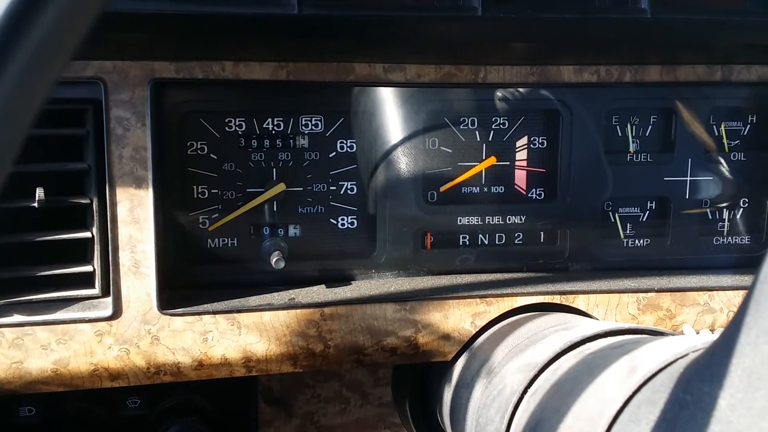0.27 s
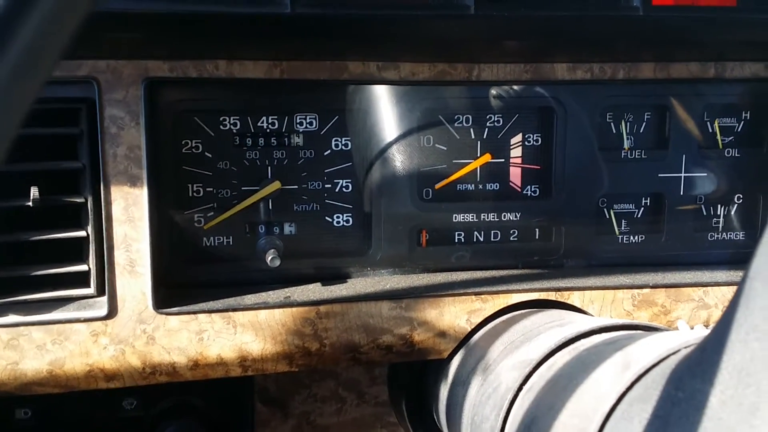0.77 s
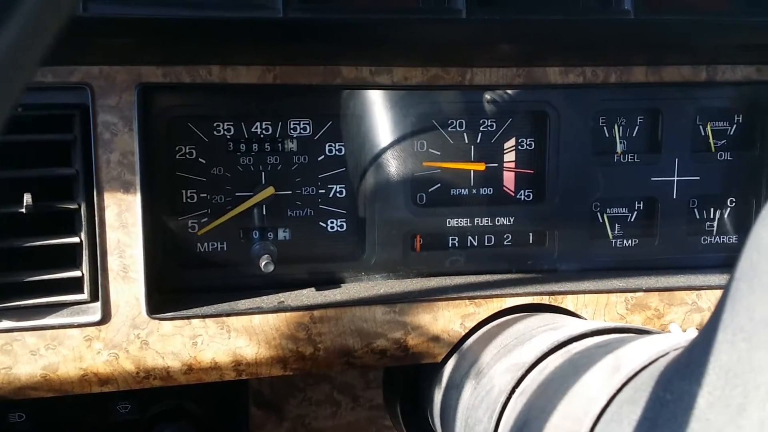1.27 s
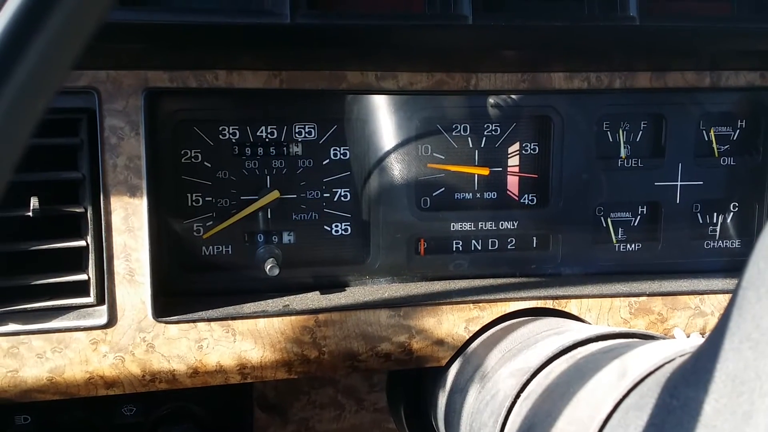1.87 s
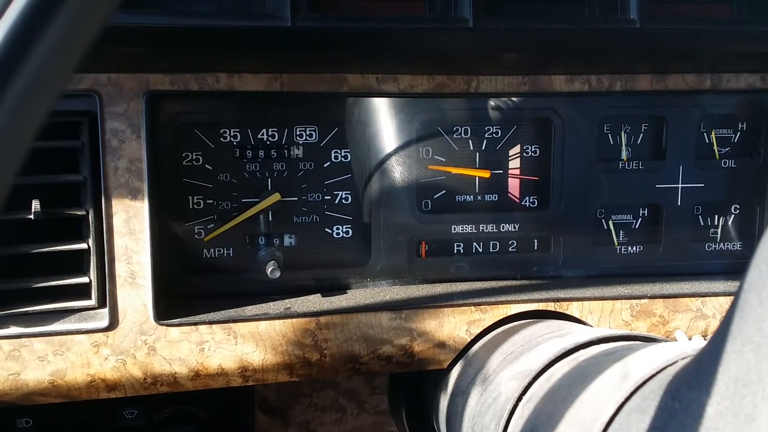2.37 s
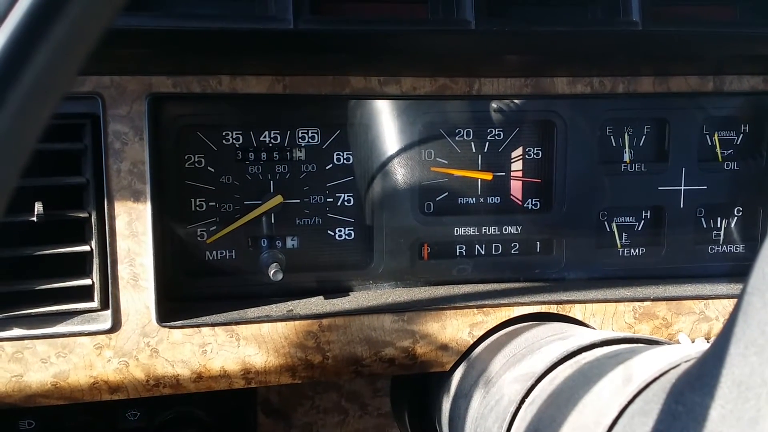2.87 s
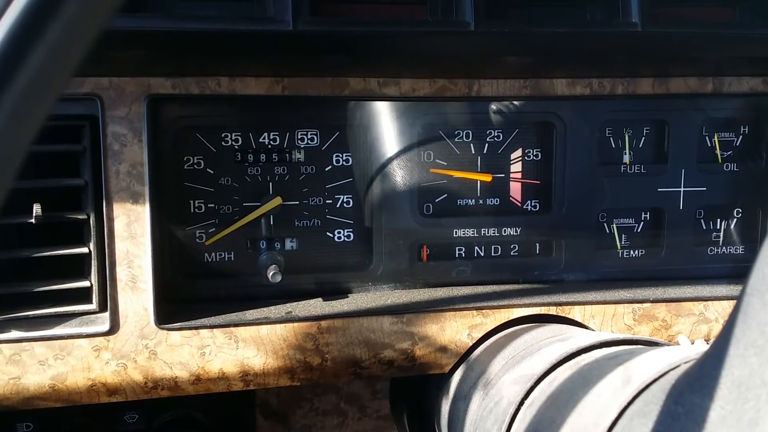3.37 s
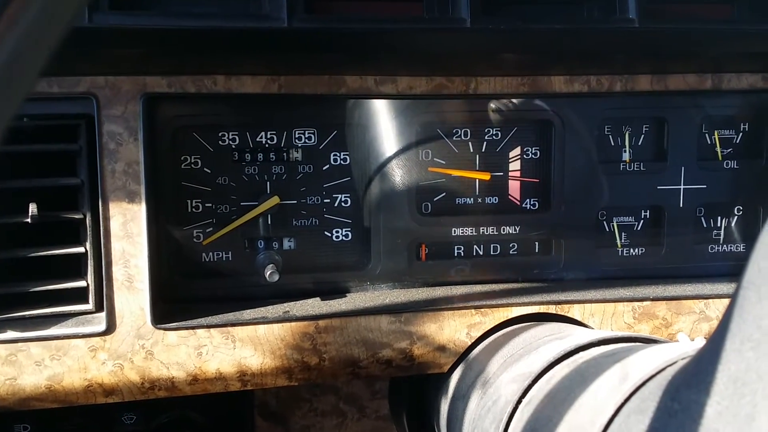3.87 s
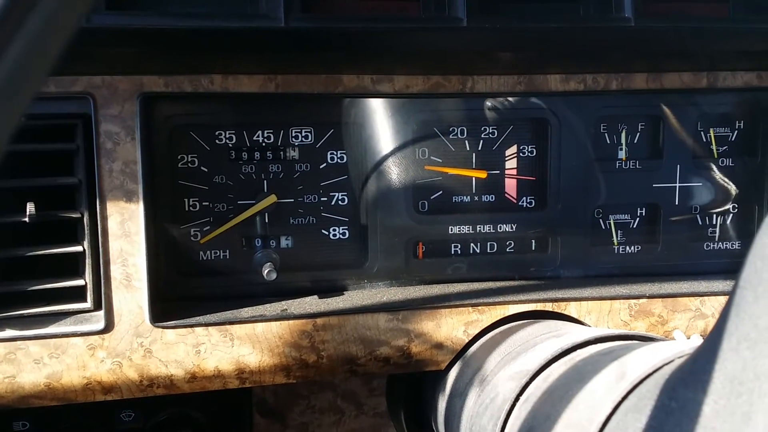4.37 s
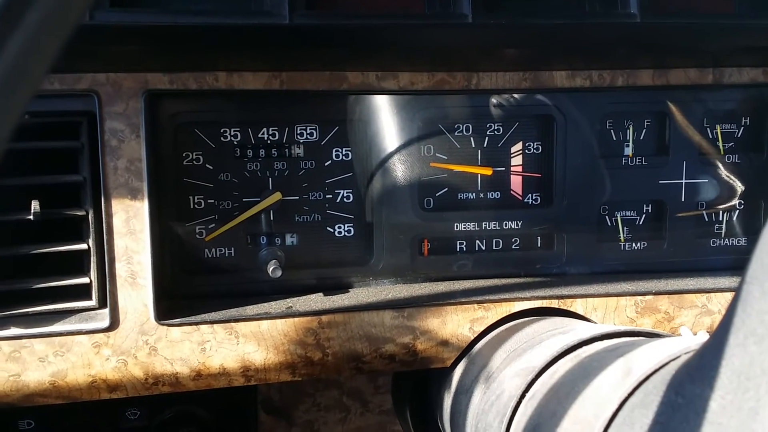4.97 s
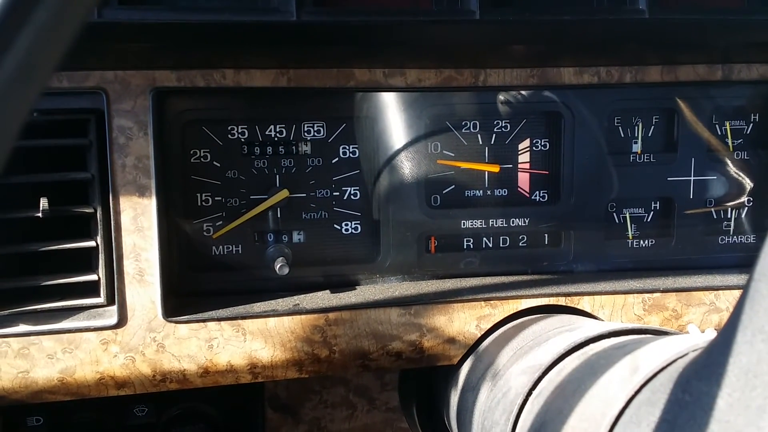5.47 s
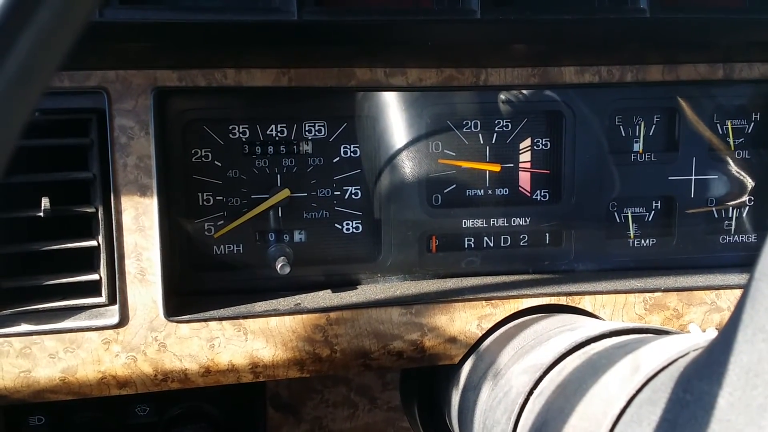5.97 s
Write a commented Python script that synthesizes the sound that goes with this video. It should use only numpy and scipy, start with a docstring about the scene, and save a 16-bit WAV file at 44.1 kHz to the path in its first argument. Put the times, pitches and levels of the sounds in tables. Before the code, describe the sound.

A diesel pickup starts, heard from the driver's seat. A fuel pump hums at first, with faint key clicks around 0.2 seconds. At 0.3 seconds the solenoid clicks and the starter grinds over low thumps. The engine catches at about 0.7 seconds with a brief flare and a shudder that sets the plastic dashboard buzzing until about 1 second. A faint hiss swells and stops near 1.3 seconds. The engine settles into a loping idle with a low throb, metallic injector clatter and a constant gear whine. At about 2.7 seconds there is a loud popping blip and a split-second dropout. The idle returns with a few electrical pops, quieter and now in stereo instead of mono, creeping back up until about 4 seconds. A soft bump comes at 4.3 seconds, a sharp plastic click at 5.6, and a small bump and pop at 5.9 as the idle continues.

```python
"""Diesel pickup starting, from the cab.

A fuel pump hums, the starter pinion grinds on the ring gear, and a V8 diesel catches with a shudder
that rattles the dash. It settles to a loping idle: uneven firings throb, injectors clatter, timing
gears whine. Midway the sound jumps, cuts out and comes back with a few pops, quieter and in stereo."""
import sys
import numpy as np
from scipy import signal
from scipy.fft import rfft, irfft, next_fast_len
from scipy.io import wavfile
from scipy.ndimage import map_coordinates

SR = 44100
rng = np.random.default_rng(int(sys.argv[2]) if len(sys.argv) > 2 else 0)


def waveform_to_disk(signal):
    """Save audio, clipped to [-1, 1], as 16-bit WAV at the path in sys.argv[1]."""
    frames = np.transpose(np.atleast_2d(signal))
    scaled = np.clip(frames, -1, 1) * 32767
    samples = np.round(scaled).astype(np.int16)
    wavfile.write(sys.argv[1], SR, samples)


N = 274610
T = np.arange(N) / SR
START_S, CATCH_S = 0.3, 0.7
JUMP_S, CUT_S, BACK_S, FULL_S = 2.731, 2.748, 2.793, 2.897
FIRINGS_PER_CYCLE, TOP_HZ = 8, 15700


def engine():
    """Five layers tied to the crankshaft; their levels follow its speed and a flare of fuel."""
    firing = firing_count()
    angle = 2 * np.pi * firing / FIRINGS_PER_CYCLE
    engaged = np.clip((T - START_S) / 0.035, 0, 1)
    slowness = 1 - share_of_idle()
    flare = hump(0.84, 0.14, 0.043)

    def gain(idle_db, standstill_db, flare_db):
        return engaged * amp(idle_db + standstill_db * slowness + flare_db * flare)

    return (gain(-27, standstill_db=-14, flare_db=2.5) * boom(angle)
            + gain(-24, standstill_db=-22, flare_db=6.8) * throbs(firing)
            + gain(-33.5, standstill_db=4, flare_db=9.6) * rumble(angle)
            + gain(-32.5, standstill_db=-18, flare_db=-10) * gear_whine(angle)
            + gain(-31, standstill_db=-13.6, flare_db=-0.27) * clatter(firing))


# Each row: time in seconds, idle firing rate in Hz.
IDLE_DRIFT = [(1.6, 55.6), (2.3, 56.5), (3.1, 56.95), (4, 56.35), (4.8, 56.5), (6.2, 56.95)]

def firing_hz(crank_hz=8, catch_hz=35, settle_s=0.12):
    """The engine cranks ever faster, catches, then closes in on the governor's drifting idle."""
    idle_hz = over_time(IDLE_DRIFT)
    progress = np.clip((T - START_S) / (CATCH_S - START_S), 0, 1)
    cranking_hz = crank_hz * (catch_hz / crank_hz) ** progress
    return idle_hz - (idle_hz - cranking_hz) * np.exp(-np.maximum(T - CATCH_S, 0) / settle_s)


def share_of_idle():
    """Engine speed over idle speed."""
    return firing_hz() / over_time(IDLE_DRIFT)


def firing_count(cycle_starts_s=(1.552, 4.476)):
    """Running count of firings; the cut skips part of a cycle."""
    count = np.cumsum(firing_hz()) / SR
    before, after = np.interp(cycle_starts_s, T, count)
    origin = np.where(T < CUT_S, before, before + (after - before) % FIRINGS_PER_CYCLE)
    return count - origin + 0.01 * wobble(12)


# Each row: place in the cycle in firings, pitch in Hz, relative level in dB, half-width in seconds.
CAB_THROBS = [(0.1, 164.4, 8.5, 0.006), (1.35, 243, -10.5, 0.016), (1.64, 165.8, -2.5, 0.013),
              (1.98, 79.2, -3, 0.032), (3.55, 107.4, 7.5, 0.0061), (4.79, 241, -9.5, 0.015),
              (5.05, 84, -7.5, 0.052), (5.44, 170, -2, 0.017), (5.6, 127, -1, 0.018),
              (6.96, 221, -5.5, 0.0098), (7.27, 165.7, 0, 0.02), (7.57, 124.5, 1.5, 0.021)]

def throbs(firing):
    """Uneven firings set the cab throbbing alike in every cycle."""
    return cycle_tones(firing, CAB_THROBS, jitter_s=0.00035, scatter_db=1.18, detune=0.0093)


# Each row: multiple of the four-stroke cycle rate, relative level in dB.
BOOM_ORDERS = [(8, -2), (16, -5)]

def boom(angle):
    """The cab shakes at the firing rate and its octave."""
    return sum(amp(db + 0.97 * wobble(4.9)) * np.sin(order * angle) for order, db in BOOM_ORDERS)


# Cylinders in firing order. Each row: injector rattle, block knock, tappet tick, in relative dB.
CYLINDER_DB = [(3, -2, 6.5), (1, -1.5, 0.5), (1.5, 1.5, 0), (1.5, 1, 1.5), (4.5, 1, 5.5), (1.5, 0.5, -2),
               (-1.5, 1.5, 1.5), (-1.5, 1, 0)]
# Each row: place in the cycle in firings, pitch in Hz, relative level in dB, half-width in seconds.
METAL_CLANKS = [(0.051, 1005, -0.5, 0.006), (1, 1857, -6, 0.014), (1.651, 2000, -1.5, 0.007),
                (1.902, 3200, -16, 0.011), (2.052, 1825, 3, 0.0054), (2.751, 868, -1, 0.0049),
                (2.897, 2070, -7.5, 0.0059), (3.103, 1374, -7.5, 0.015), (3.896, 847, -10, 0.0044),
                (4.001, 1855, 3, 0.01), (4.85, 2050, -3, 0.004), (5.146, 1838, 1, 0.0074),
                (5.201, 1383, -6.5, 0.01), (5.899, 3183, -17, 0.019), (6.6, 1855, -2.5, 0.014)]
# Block, valve cover and tappet resonances. Each row: centre in Hz, width in Hz, gain in dB.
BLOCK_MODES = [(523, 125, -7.5), (693, 154, -7.5), (839.4, 51.7, 1), (1025, 74, -2), (1243, 58, -3.5),
               (1369, 33, 0), (1527, 177, -8)]
COVER_MODES = [(1816, 74, -3.5), (2082, 110, -9), (2407, 110, -19), (2747, 40, -19), (3170, 90, -23),
               (3695, 52, -28.5)]
TAPPET_MODES = [(6500, 330, 4.5), (8650, 210, -3), (9560, 130, -2.5), (10600, 400, -2), (12300, 780, -1.5)]
# Each row: frequency in Hz, gain in dB.
FIZZ_SPECTRUM = [(200, -44), (400, 10), (2200, 8), (3000, 5), (4500, -2), (6200, -1), (8000, -13),
                 (12000, -28), (16000, -32)]

def clatter(firing):
    """Each cylinder rings its own notes of block and covers, so the clatter swirls once a cycle."""
    rattle_db, knock_db, tick_db = np.transpose(CYLINDER_DB)
    clanks = cycle_tones(firing, METAL_CLANKS, jitter_s=0.001479, scatter_db=1.98, detune=0.0081)
    block = ringing(knocks(firing, knock_db, delay=0.6, fall_db=-3.5, fresh=0.85), BLOCK_MODES)
    covers = ringing(knocks(firing, rattle_db, delay=0.62, fall_db=5, fresh=0.7), COVER_MODES)
    fizz = coloured(knocks(firing, 0.35 * tick_db, delay=0.45, fall_db=5, fresh=1.3), FIZZ_SPECTRUM)
    ticks = ringing(knocks(firing, tick_db, delay=0.58, fall_db=8, fresh=0.68), TAPPET_MODES)
    return (amp(-4.5) * clanks + amp(-3) * unit(block) + amp(-6) * unit(covers)
            + amp(-13) * unit(fizz) + amp(-33) * unit(ticks))


def knocks(firing, cylinder_db, delay, fall_db, fresh, size=6200):
    """One burst per firing: each cylinder repeats its own rattle, plus some fresh noise."""
    beat = firing - delay
    place = beat / FIRINGS_PER_CYCLE % 1 * size
    repeating = np.array([np.interp(place, np.arange(size), rng.standard_normal(size)) for _ in range(2)])
    cylinder = np.floor(beat).astype(int) % FIRINGS_PER_CYCLE
    level_db = cylinder_db[cylinder] - fall_db * (beat % 1)
    return spread(amp(level_db) * (repeating + fresh * rng.standard_normal((2, N))))


def cycle_tones(firing, rows, jitter_s, scatter_db, detune):
    """Each row's tone swells and dies once a cycle, never quite the same."""
    track, t = np.zeros(N), T[:SR // 10] - T[SR // 20]
    for place, hz, db, half_width_s in rows:
        cycle = np.floor((firing - place) / FIRINGS_PER_CYCLE)
        peaks_s = T[1:][np.diff(cycle) > 0]
        for peak_s, (late, size, pitch) in zip(peaks_s, rng.standard_normal((64, 3))):
            tone = np.cos(2 * np.pi * hz * (1 + detune * pitch) * t)
            envelope = amp(db + scatter_db * size) * np.exp(-(t / half_width_s) ** 2)
            add(track, max(peak_s + t[0] + jitter_s * late, 0), envelope * tone)
    return track


# Each row: teeth passing per cycle, relative level in dB.
TIMING_GEARS = [(50, 4.5), (58, -11.5)]

def gear_whine(angle):
    """Meshing timing gears whine, wavering slightly in level and phase."""
    return unit(sum(amp(db + 0.68 * wobble(30)) * np.sin(teeth * angle + 0.17 * wobble(40))
                    for teeth, db in TIMING_GEARS))


# Each row: frequency in Hz, gain in dB.
CAB_SPECTRUM = [(30, -33), (70, -8), (100, 7.5), (135, 1), (190, 0.5), (240, -6.5), (300, -3.5), (380, -9),
                (450, -19.5), (1200, -33), (2000, -41), (6000, -86)]

def rumble(angle, swell_db=2.5):
    """Low cab noise swells once a cycle as the running block rocks."""
    return amp(swell_db * np.cos(angle) * share_of_idle() ** 4) * stereo_noise(CAB_SPECTRUM)


# Each row: multiple of the mesh rate, relative level in dB.
PINION_HARMONICS = [(1, 0.5), (2, 3), (3, -8), (4, -6)]
# The load lets go. Each row: peak time in seconds, mesh rate gained in Hz, rise and fall in seconds.
STARTER_SPURTS = [(.484, 220.4, .06, 0.028), (.606, 441, 0.0074, 0.05)]
# The load returns. Each row: peak time in seconds, whine boost in dB, crunch in dB, rise in seconds.
TOOTH_BITES = [(0.349, 6, -27.5, 0.016), (0.503, 10.5, -42, 0.042), (.609, 17, -34.5, 0.004)]
# Each row: centre in Hz, width in Hz, gain in dB.
HOUSING_MODES = [(1180, 180, -13), (2000, 230, 2.5), (2930, 150, 6.5), (3250, 47, 10), (4200, 230, -2.5),
                 (5300, 180, -1), (8900, 1100, -20)]

def starter(loaded_hz=813, spin_up_s=0.084, bite_fall_s=0.018, release_s=0.704, release_db_per_s=150):
    """The pinion grinds on the ring gear and rings the bell housing until the engine outruns it."""
    mesh_hz = loaded_hz + sum(hz * hump(s, rise, fall) for s, hz, rise, fall in STARTER_SPURTS)
    overrun = ramp(0, 1, 0.56, 0.064)
    chatter = (0.25 + 0.47 * overrun) * wobble(350)  # unloaded teeth chatter more
    angle = 2 * np.pi * np.cumsum(mesh_hz) / SR + chatter
    teeth = sum(amp(db + 2 * wobble(140)) * np.sin(k * angle) for k, db in PINION_HARMONICS)
    whine = ringing(teeth, BLOCK_MODES + COVER_MODES) + amp(-18) * teeth
    scrape = rng.standard_normal(N) * amp(1.8 * wobble(120))
    grind = unit(ringing(scrape, HOUSING_MODES) * amp(3.5 * wobble(90)))  # teeth catch and skip
    crunch = unit(butterworth(scrape, 5, [850, 2350], "bandpass"))
    crunch *= sum(amp(db) * hump(s, rise, bite_fall_s) for s, _, db, rise in TOOTH_BITES)
    bite_db = sum(db * hump(s, rise, bite_fall_s) for s, db, _, rise in TOOTH_BITES)
    drive_db = -33 - 7 * overrun - release_db_per_s * np.maximum(T - release_s, 0)
    drive = np.clip((T - START_S) / spin_up_s, 0, 1) * amp(drive_db)
    return drive * (amp(bite_db) * whine + amp(-15.5 + 13.5 * overrun) * grind) + crunch


# Each row: start in seconds, ring level in dB, ring pitch in Hz, thud level in dB.
CAB_THUMPS = [(0.306, -20, 166, -30), (.352, -13.5, 141, -23.5), (0.399, -13.5, 135.6, -32),
              (0.61, -20, 112, -37), (.661, -19.5, 161, -33), (0.757, -11, 87, -28), (0.794, -26, 143, -27),
              (.845, -8, 79.6, -27), (0.897, -6.5, 74, -34), (.956, -19.5, 208, -34),
              (4.284, -25.5, 308, -36), (5.885, -26.5, 202, -30.5)]

def thumps(t60_s=0.2):
    """Low thumps as the engine starts, and two later bumps in the cab: a low ring and a dull thud."""
    track, t = np.zeros(N), T[:SR // 4]
    envelope = amp(-60 * t / t60_s) * (1 - np.exp(-t / 0.001))
    for start_s, ring_db, hz, thud_db in CAB_THUMPS:
        ring = amp(ring_db) * np.sin(2 * np.pi * hz * t)
        thud = amp(thud_db) * unit(butterworth(rng.standard_normal(len(t)), 2, [120, 700], "bandpass"))
        add(track, start_s, envelope * (ring + thud))
    return track


# Each row: start in seconds, relative level in dB, 60 dB decay in seconds, low-pass cutoff in Hz.
PART_CLICKS = [(0.173, -43, 0.094, 12000), (0.193, -40, 0.074, 12000), (.2283, -43, 0.12, 12000),
               (0.301, -28.5, 0.46, 7900), (0.342, -24.5, 0.1, 7460), (0.6528, -28.5, 0.13, 12000),
               (.689, -28, 0.048, 12000), (5.6039, -7.5, 0.058, 18000)]
# Hard plastic. Each row: frequency in Hz, gain in dB.
TRIM_SPECTRUM = [(300, -18), (1500, -4.5), (3000, 0), (6000, -1.5), (9000, -9), (12300, -10), (16000, -13)]

def clicks(attack_s=0.000087):
    """Keys, solenoid and trim click in short, bright bursts."""
    track, t = np.zeros((2, N)), T[:SR // 4]
    for start_s, db, t60_s, cutoff_hz in PART_CLICKS:
        burst = butterworth(rng.standard_normal((2, len(t))), 2, cutoff_hz, "lowpass")
        add(track, start_s, amp(db - 60 * t / t60_s) * (1 - np.exp(-t / attack_s)) * burst)
    return amp(-2) * coloured(track, TRIM_SPECTRUM)


# Each row: start in seconds, level in dB, centre pitch in Hz.
DASH_SHAKES = [(0.737, -25, 6110), (.758, -22, 5370), (0.771, -28, 6100), (0.78, -30, 7200),
               (.793, -28.5, 6360), (0.8193, -30, 4300), (0.829, -28, 4600), (0.8363, -25, 4950),
               (.856, -32, 6960), (.87, -24.5, 10100), (.915, -39, 7900), (0.967, -43, 6000),
               (0.9906, -38.5, 5940)]

def dash(pieces=40, scatter_s=0.0025, t60_s=0.024, from_s=0.737, until_s=0.896, fade_db_per_s=20):
    """The shudder sets the dash buzzing; at each shake loose pieces of trim ring one after another."""
    track, t = np.zeros(N), T[:SR // 16]
    for start_s, db, centre_hz in DASH_SHAKES:
        pitch, size, late = rng.standard_normal((3, pieces, 1))
        hz = centre_hz * np.exp(0.42 * pitch)
        age_s = np.maximum(t - scatter_s * np.abs(late), 0)
        rings = (hz < TOP_HZ) * amp(5.55 * size - 60 * age_s / t60_s) * np.sin(2 * np.pi * hz * age_s)
        add(track, start_s, amp(db) * rings.sum(0) / np.sqrt(pieces))
    shaking = ramp(0, 0.97, from_s, 0.005) * ramp(0.97, 0, until_s, 0.019)
    settling = (T > until_s) * amp(-14.5 - fade_db_per_s * (T - until_s))
    buzz = unit(coloured(rng.standard_normal(N) * amp(3.1 * wobble(250)), TRIM_SPECTRUM))
    return track + amp(-37) * (shaking + settling) * buzz


# Each row: pitch in Hz, rms level in dB.
PUMP_TONES = [(102.3, -45), (204.6, -38.5), (301.5, -44.5), (403.7, -64), (506.0, -60.5)]

def fuel_pump(fade_from_s=0.52, fade_s=0.27):
    """The electric pump hums until the engine takes over."""
    hum = sum(amp(db + wobble(5)) * np.sqrt(2) * np.sin(2 * np.pi * (hz * T + rng.random()))
              for hz, db in PUMP_TONES)
    return hum * np.clip(1 - (T - fade_from_s) / fade_s, 0, 1)


def hiss():
    """A thin hiss swells and stops while the engine settles."""
    air = unit(coloured(rng.standard_normal(N), [(1500, -18), (5000, 7), (8000, 0), (15000, -12)]))
    return amp(-50.5) * hump(1.26, 0.11, 0.04) * air


# Each row: frequency in Hz, gain in dB.
AIR_SPECTRUM = [(25, -52), (60, -2.5), (130, 2), (240, -6.5), (350, -7), (600, -24.5), (1000, -29.5),
                (3000, -38), (8000, -42.5), (16000, -43)]

def cab_air():
    """The steady, low background of the quiet cab."""
    return amp(-41.5) * stereo_noise(AIR_SPECTRUM)


# Each row: frequency in Hz, left-right correlation.
STEREO_CORRELATION = [(60, 0.21), (130, 1), (290, -0.11), (640, 0.73), (1410, -0.18), (3100, 0.17),
                      (6820, 0.06), (15000, -0.28)]

def spread(pair):
    """Two unrelated signals become left and right, most alike near 130 Hz."""
    turn = lambda hz: np.arccos(np.clip(over_hz(STEREO_CORRELATION, hz), -1, 1)) / 2
    mid, side = filtered(pair, lambda hz: np.array([np.cos(turn(hz)), np.sin(turn(hz))]))
    return np.array([mid + side, mid - side])


def stereo_noise(spectrum):
    """Coloured stereo noise at rms 1."""
    return unit(spread(coloured(rng.standard_normal((2, N)), spectrum)))


def amp(db):
    """Decibels to gain."""
    return 10 ** (np.asarray(db) / 20)


def unit(x):
    """Scaled to rms 1."""
    return x / np.sqrt(np.mean(x ** 2) + 1e-20)


def over_hz(points, hz):
    """(Hz, value) points joined on a log axis."""
    knots_hz, values = np.transpose(points)
    return np.interp(np.log(hz + 1), np.log(knots_hz + 1), values)


def over_time(points):
    """(seconds, value) points joined, one value per sample."""
    return np.interp(T, *np.transpose(points))


def hump(peak_s, rise_s, fall_s):
    """A smooth swell from 0 to 1 and back."""
    return np.exp(-((T - peak_s) / np.where(T < peak_s, rise_s, fall_s)) ** 2)


def ramp(first, last, halfway_s, length_s):
    """A steady move from one value to another."""
    return first + (last - first) * np.clip((T - halfway_s) / length_s + 0.5, 0, 1)


def wobble(knots_per_s):
    """A smooth random curve."""
    return map_coordinates(rng.standard_normal(int(N * knots_per_s / SR) + 4), [T * knots_per_s])


def butterworth(x, order, hz, kind):
    """x through a Butterworth filter."""
    return signal.sosfilt(signal.butter(order, hz, kind, fs=SR, output="sos"), x)


def filtered(x, response):
    """x times a complex response of frequency."""
    size = next_fast_len(N + SR // 2)
    return irfft(rfft(x, size) * response(np.fft.rfftfreq(size, 1 / SR)), size)[..., :N]


def coloured(x, spectrum, size=8192):
    """x through the minimum-phase filter with this (Hz, dB) spectrum."""
    cepstrum = irfft(np.log(amp(over_hz(spectrum, np.fft.rfftfreq(size, 1 / SR)))))
    cepstrum[1:size // 2] *= 2
    cepstrum[size // 2 + 1:] = 0
    impulse = irfft(np.exp(rfft(cepstrum)))
    return signal.fftconvolve(np.atleast_2d(x), impulse[None], axes=1)[:, :N]


def ringing(x, modes):
    """x through parallel resonances of alternating sign."""
    def response(hz):
        return sum((-1) ** k * amp(db) * 1j * hz * width / (centre ** 2 - hz ** 2 + 1j * hz * width)
                   for k, (centre, width, db) in enumerate(modes))
    return filtered(x, response)


def add(track, start_s, sound):
    """Mix a short sound into a track."""
    part = track[..., round(start_s * SR):][..., :sound.shape[-1]]
    part += sound[..., :part.shape[-1]]


def scene():
    """Everything heard from the driver's seat."""
    return engine() + starter() + fuel_pump() + cab_air() + clicks() + dash() + thumps() + hiss()


# Each row: start in seconds, relative level in dB.
ELECTRICAL_POPS = [(2.73, -2), (2.747, -2), (2.839, -14.5), (2.8415, -21), (2.866, -11.5), (3.002, -15),
                   (5.8982, -16)]

def pops(ring_hz=120, chirp_hz=420, decay_s=0.007, edge_s=0.00018):
    """Electrical pops: a sharp step that swings back ever more slowly."""
    track, t = np.zeros(N), T[:SR // 20]
    swing = np.cos(2 * np.pi * np.cumsum(ring_hz + chirp_hz * np.exp(-t / 0.0012)) / SR)
    envelope = np.exp(-t / decay_s) * (1 - 0.33 * np.exp(-t / edge_s))
    for start_s, db in ELECTRICAL_POPS:
        add(track, start_s, amp(db - 3.5) * envelope * swing)
    return track


# Tone after the cut, left side only and both sides. Each row: frequency in Hz, gain in dB.
LEFT_EQ = [(60, -6), (110, -5), (200, -3.5), (380, -11), (700, -5), (1290, -5), (2380, -3), (4400, -4.5),
           (8120, -2), (15000, -0.5)]
RETURN_EQ = [(60, 2.5), (110, -1.5), (200, 0.5), (270, 3), (355, -3), (500, -2.5), (900, -0.5), (1600, -2),
             (1830, -2.5), (2080, 1.7), (2600, -1), (3200, -4), (4200, 0), (6000, 0.7), (9000, 1.15)]

def record(dry, jump_db=13.5, mute_db=-40, faint_db=-5.5, crossover_hz=306):
    """Mono at first; a loud blip and a dropout, then stereo that creeps back up, the bass first."""
    pair = np.array([filtered(dry[0], lambda hz: amp(over_hz(LEFT_EQ, hz))), dry[1]])
    pair = filtered(pair, lambda hz: amp(over_hz(RETURN_EQ, hz)))
    bass = filtered(pair, lambda hz: 1 / (1 + (hz / crossover_hz) ** 4))
    bass_db = ramp(-9.5, -2, halfway_s=3, length_s=1.1)
    treble_db = ramp(-4.5, 0.58, halfway_s=3.5, length_s=1.5)
    returning = bass * amp(bass_db) + (pair - bass) * amp(treble_db)
    heard = butterworth(np.where(T < CUT_S, dry[1], returning), 6, 48, "highpass")
    back_db = ramp(faint_db, 0, FULL_S, 0.012)
    gain_db = np.select([T < JUMP_S, T < CUT_S, T < BACK_S], [0, jump_db, mute_db], back_db)
    crackle = pops() * np.where((T > CUT_S) & (T < BACK_S), amp(mute_db), 1)
    clipped = np.clip(heard * amp(gain_db) + crackle, -1, 1)
    return filtered(clipped, lambda hz: hz < TOP_HZ)


dry = scene()
out = record(dry)
waveform_to_disk(out)
```